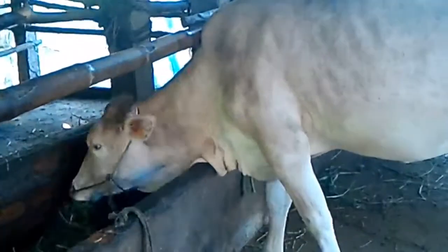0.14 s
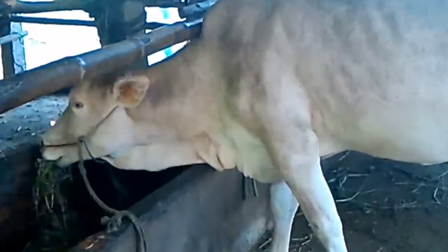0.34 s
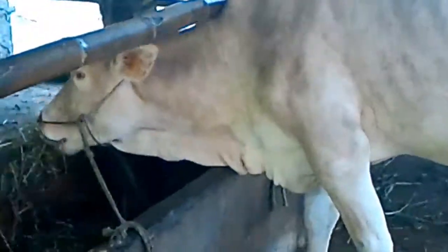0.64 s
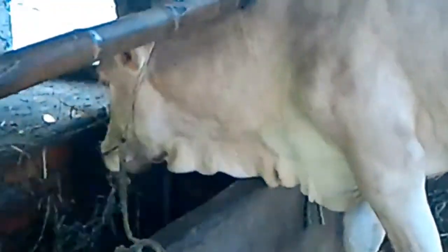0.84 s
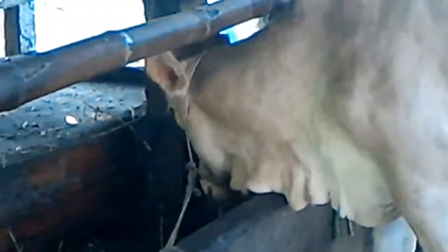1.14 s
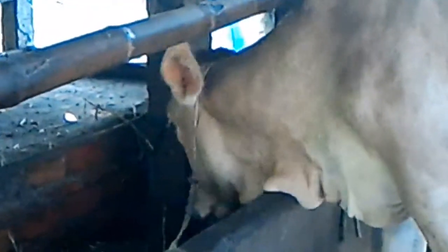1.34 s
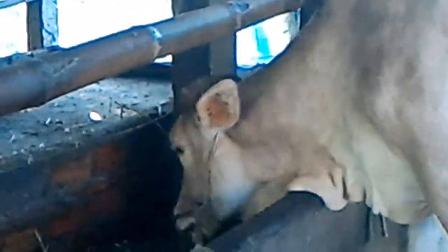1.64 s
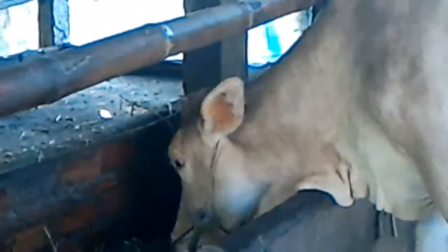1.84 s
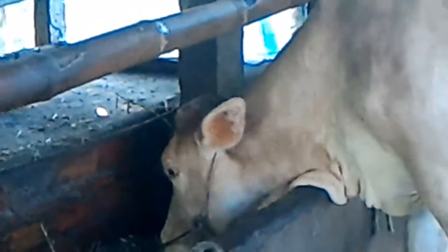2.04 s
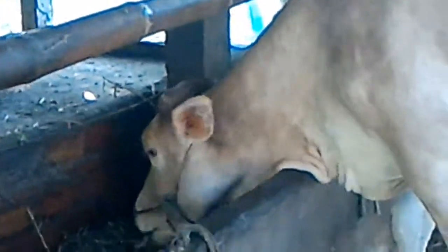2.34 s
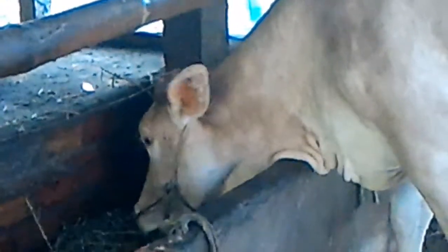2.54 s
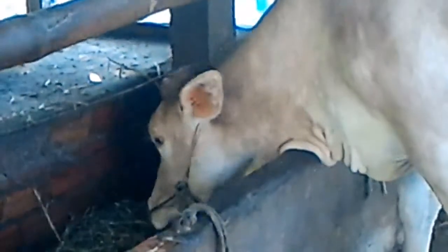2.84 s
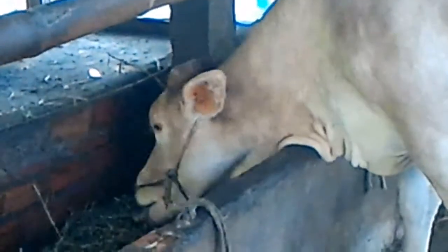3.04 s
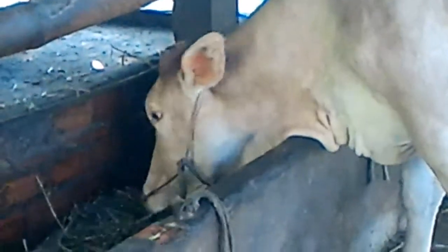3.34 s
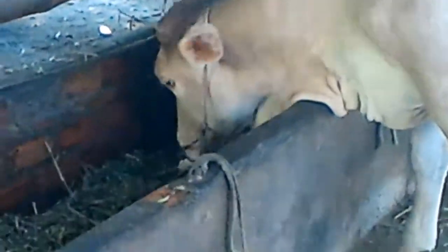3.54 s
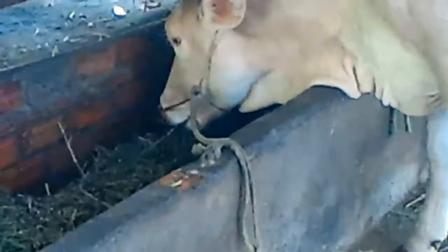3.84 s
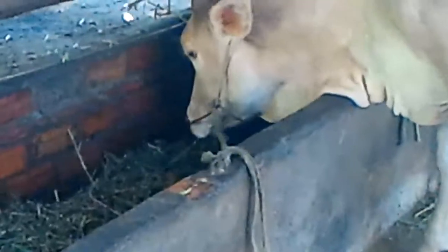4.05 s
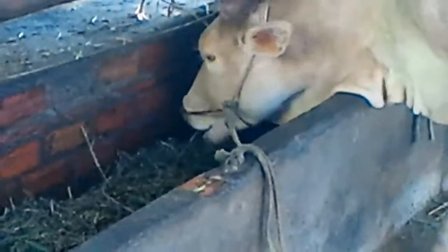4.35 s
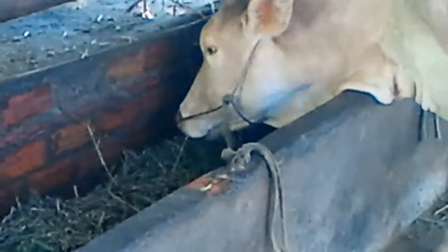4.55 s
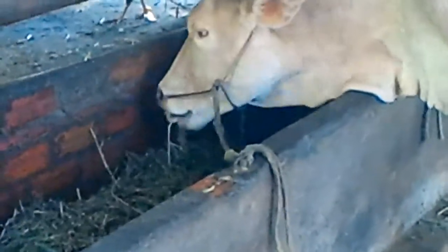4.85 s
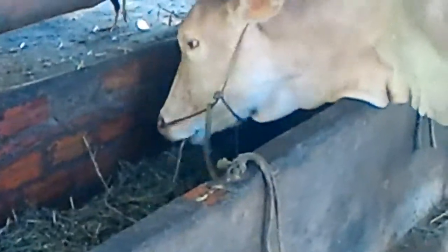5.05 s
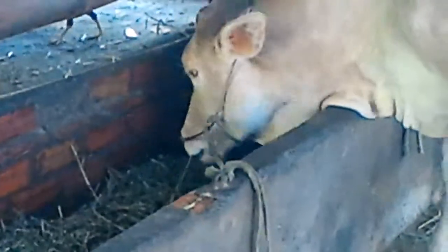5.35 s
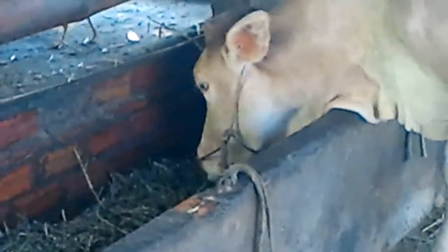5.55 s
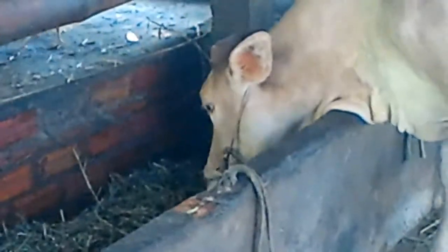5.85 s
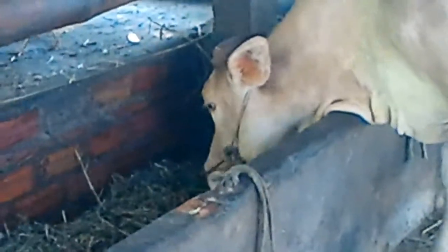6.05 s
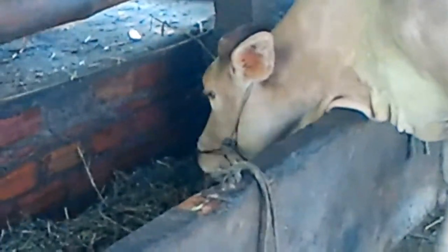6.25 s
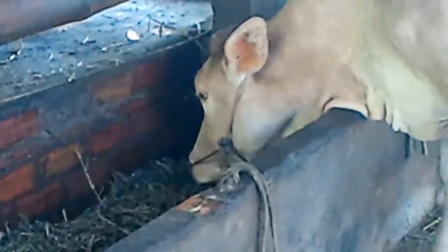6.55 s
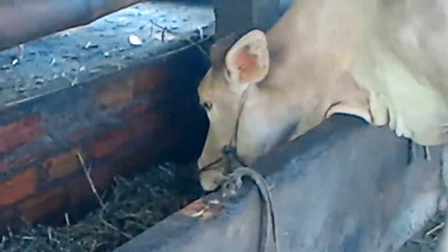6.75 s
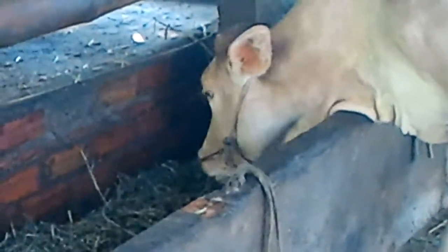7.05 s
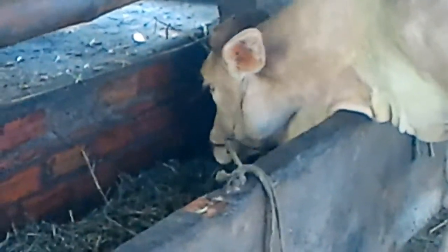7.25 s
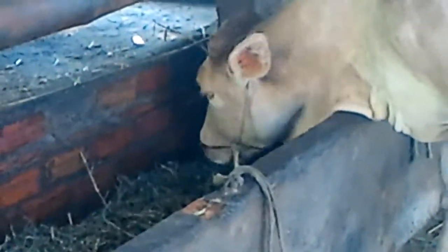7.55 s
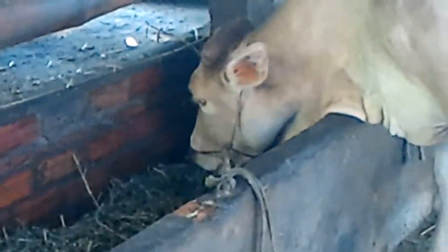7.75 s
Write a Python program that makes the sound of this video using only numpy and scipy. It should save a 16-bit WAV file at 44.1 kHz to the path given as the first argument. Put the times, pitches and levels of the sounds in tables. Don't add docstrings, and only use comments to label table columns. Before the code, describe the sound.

In a quiet cattle shed, hens cluck faintly, far roosters crow, then a cow gives one loud low moo ending roughly amid thumps and straw snaps.

```python
import sys
import numpy as np
from scipy import signal
from scipy.fft import rfft, irfft, next_fast_len
from scipy.io import wavfile
from scipy.ndimage import uniform_filter1d, map_coordinates

SR = 44100
rng = np.random.default_rng(int(sys.argv[2]) if len(sys.argv) > 2 else 0)


def rack_gain(trim_db):
    fader = np.asarray(trim_db, float)
    return 10 ** (fader / 20)


def unload_wav(signal):
    wavfile.write(
        sys.argv[1],
        SR,
        np.round(np.clip(np.atleast_2d(signal).T, -1, 1) * 32767).astype(np.int16),
    )


N = 348998
TIME = np.arange(N) / SR


def unit(x):
    return x / np.sqrt(np.mean(x ** 2) + 1e-20)


def along(points, hz):
    f, v = np.transpose(points)
    return np.interp(np.log(hz + 1), np.log(f + 1), v)


def curves(rows):
    s, *cols = np.transpose(rows)
    return [np.interp(TIME, s, c) for c in cols]


def gate(start, length, edge):
    inside = np.minimum(TIME - start, start + length - TIME)
    return np.clip(inside / edge, 0, 1) ** 2


def rising(at_s, takes_s):
    return 0.5 + 0.5 * np.tanh((TIME - at_s) / takes_s / 2)


def lifts(rows):
    bells = []
    for s, rise, fall, db in rows:
        side = np.where(TIME < s, rise, fall)
        bells.append(db * np.exp(-0.5 * ((TIME - s) / side) ** 2))
    return np.max(bells, axis=0)


def wobble(rate):
    knots = rng.standard_normal(int(N * rate / SR) + 4)
    return map_coordinates(knots, [TIME * rate])


def coloured(x, level_db):
    m = next_fast_len(len(x) + SR // 2)
    gain = rack_gain(level_db(np.fft.rfftfreq(m, 1 / SR)))
    cepstrum = irfft(np.log(gain + 1e-6), m)
    cepstrum[1:m // 2] *= 2
    cepstrum[m // 2 + 1:] = 0
    return irfft(rfft(x, m) * np.exp(rfft(cepstrum)), m)[:len(x)]


def humps(peaks):
    def level_db(f):
        power = sum(rack_gain(db) ** 2 / (1 + ((f - c) / w) ** 2) ** 2 for c, w, db in peaks)
        return 10 * np.log10(power)
    return level_db


def rush(spectrum, patchy_db):
    z = signal.stft(rng.standard_normal(N), nperseg=512)[2]
    field = uniform_filter1d(rng.standard_normal(z.shape), size=8, axis=0)
    field = uniform_filter1d(field, size=10, axis=1)
    x = signal.istft(z * rack_gain(patchy_db * unit(field)), nperseg=512)[1][:N]
    return unit(coloured(x, lambda hz: along(spectrum, hz)))


# frequency in Hz, density in dB per Hz.
RUMBLE = [(12, -47), (20, -15.5), (38, -2.5), (59, -1), (118, -7), (152, -10), (220, -29.5), (290, -36),
          (480, -120)]
# peak in seconds, rise in seconds, fall in seconds, lift in dB.
RUMBLE_LIFTS = [
    (2.68, .2, .15, 4.7),
    (5.5, 0.43, 0.23, 12),
    (5.9, 0.23, .35, 13.1),
]


def rumble():
    return rack_gain(-61 + lifts(RUMBLE_LIFTS) + 2.5) * rush(RUMBLE, patchy_db=0.5)


# frequency in Hz, density in dB per Hz.
YARD = [(120, -41), (200, 1), (222, -5), (345, -4.5), (552, -10), (624, -8), (1410, -10.5), (1750, -11.5),
        (4090, -18), (7500, -33.5), (9750, -63), (16500, -120)]
# frequency in Hz, density in dB per Hz.
HISS = [(2940, -39), (5000, -2), (6610, -11.5), (7980, -10), (8820, -3.5), (10500, 0.5), (11700, -5),
        (15100, -6.5), (15800, -5)]
# peak in seconds, rise in seconds, fall in seconds, lift in dB.
HISS_LIFTS = [
    (1.94, .2, 0.1, 4),
    (2.72, 0.16, 0.11, 5.5),
    (5.25, 0.36, 0.38, 12),
    (5.8, 0.34, 0.3, 10.5),
]


def murmur_and_hiss():
    hiss_db = -72.5 + lifts(HISS_LIFTS)
    murmur = rack_gain(1.05 * (hiss_db + 73.5) - 68.5) * rush(YARD, patchy_db=1.1)
    hiss = rack_gain(hiss_db + 3 + 0.51 * wobble(11)) * rush(HISS, patchy_db=2.0)
    return murmur + hiss


def far_notes(notes):
    out = np.zeros(N)
    drift, flutter = wobble(35), wobble(22)
    for s, length, start_hz, glide_hz, db, octave_db in notes:
        i, n = round(s * SR), round(length * SR)
        u = np.arange(n) / n
        shift = rng.integers(N - n)
        hz = (start_hz + glide_hz * u) * (1 + 0.0025 * drift[shift:shift + n])
        half_phase = np.pi * np.cumsum(hz) / SR
        tone = np.sin(2 * half_phase) + rack_gain(octave_db) * np.sin(half_phase)
        swell = rack_gain(3 + 2.2 * flutter[shift:shift + n]) * np.sin(np.pi * u ** 0.4) ** 0.6
        out[i:i + n] += rack_gain(db) * swell * tone
    return out


# start in seconds, length in seconds, frequency in Hz, level in dB.
HENS = [(0, 0.15, 990, -72), (0.891, 0.24, 992, -71.5), (0.95, 0.098, 1057, -76), (1.876, .1, 2440, -72),
        (2.415, 0.13, 1036, -64), (2.7, 0.17, 1025, -65.5), (3.65, .41, 1010, -83),
        (4.226, 0.31, 987, -75.5), (6.459, 0.083, 1624, -67), (7.027, 0.078, 1763, -64.5),
        (7.228, 0.13, 1793, -73), (7.389, .09, 1780, -73), (7.696, .2, 1690, -77)]


def hens():
    return far_notes([(s, length, hz, -19, db, -30) for s, length, hz, db in HENS])


def burst(shape, hz, octaves):
    band = lambda f: np.maximum(-4.3 * (np.log2((f + 1) / hz) / octaves) ** 2, -70)
    return shape * unit(coloured(rng.standard_normal(len(shape)), band))


# start in seconds, length in seconds, centre in Hz, width in octaves, level in dB.
PUFFS = [(0.19, 0.16, 3830, 0.37, -63), (5.865, 0.058, 14000, 0.59, -52.5), (5.815, 0.042, 8800, 1, -62),
         (3.85, 0.98, 1100, 0.92, -75.5), (0.2, 0.24, 2010, 0.21, -72), (0.52, 0.036, 500, 0.29, -76),
         (0.69, 0.24, 1100, 0.81, -70), (1.002, .09, 3370, .25, -67), (1.417, .064, 950, .69, -68),
         (1.605, .05, 570, 1.3, -65.5), (1.808, .07, 770, 0.85, -68), (1.64, 0.67, 3700, 0.36, -75),
         (2.74, 0.16, 1700, 1.04, -67), (3.492, 0.064, 450, 1.16, -56), (4.065, 0.19, 2070, 0.72, -67),
         (6.502, 0.73, 2170, 0.55, -64), (6.564, 0.25, 770, 0.7, -67.5), (7.409, 0.1, 450, 0.42, -68),
         (7.422, 0.12, 2000, .6, -70.5), (7.15, 0.82, 970, 1.4, -81), (7.14, .22, 330, 0.19, -72.5),
         (1.08, 0.053, 500, .35, -74), (2.3, 0.15, 620, 0.18, -69)]


def snorts_and_rustles():
    out = np.zeros(N + SR)
    for s, length, hz, octaves, db in PUFFS:
        u = np.linspace(0, 1, round(length * SR))
        swell = np.sin(np.pi * u ** 0.7) ** 1.2
        out[round(s * SR):][:len(u)] += rack_gain(db + 3) * burst(swell, hz, octaves)
    return out[:N]


# centre in Hz, width in Hz, level in dB.
BEAK = [(750, 93, 0.5), (1057, 96, -5), (1480, 215, -0.5), (1880, 150, -5), (2860, 250, -13),
        (3260, 230, -14.5)]
# start in seconds, length in seconds, frequency in Hz, glide in Hz, level in dB.
CROWS = [
    (1.98, 0.24, 1350, -14, -65),
    (2.2, 0.23, 1510, 33.5, -65.5),
    (2.385, 0.14, 1345, 57, -57.5),
    (2.461, 0.14, 1450, 10, -55),
    (2.581, 0.305, 1546, -14, -54),
    (2.62, 0.423, 1645, -24, -66.5),
    (3.28, 0.46, 1378, 7.5, -65.5),
    (3.581, 0.26, 1318, -21, -62),
]
# start in seconds, length in seconds,
# frequency in Hz, glide in Hz, level in dB.
FAR_CALLS = [
    (2.05, 0.33, 1793, 5.5, -78),
    (2.187, 0.14, 2304, -61, -89),
    (2.294, .5, 2850, 201, -74),
    (2.45, .8, 1880, 14.5, -74),
    (2.78, .38, 2880, -170, -67.5),
    (2.799, 0.25, 3034, -220, -67),
]


def roosters():
    tones = far_notes([(*row, -8) for row in CROWS] + [(*row, -30) for row in FAR_CALLS])
    rise_db_per_s, fall_db_per_s, peak_s = 27.5, 11.5, 2.7
    rasp_db = -56 - np.maximum(rise_db_per_s * (peak_s - TIME), fall_db_per_s * (TIME - peak_s))
    throbbing = rng.standard_normal(N) * rack_gain(2 * wobble(90))
    rasp = unit(coloured(throbbing, humps(BEAK)))
    return tones + rack_gain(rasp_db) * gate(1.82, 1.99, edge=0.061) * rasp


# start in seconds, peak in dB, centre in Hz, width in octaves, decay time t60 in seconds.
KNOCKS = [
    (2.033, -47, 3120, 0.18, 0.053),
    (2.408, -42, 1360, 0.14, 0.07),
    (3.499, -42, 604, 0.48, 0.059),
    (5.566, -15.5, 397, 0.66, 0.024),
    (5.813, -38.5, 750, 0.22, 0.04),
    (5.864, -40.5, 1160, 0.44, 0.04),
    (7.424, -50.5, 2800, 0.29, 0.045),
    (7.729, -55.5, 2000, 0.41, 0.025),
]
# start in seconds, peak in dB, centre in Hz, width in octaves, decay time t60 in seconds.
SNAPS = [
    (2.358, -59, 2730, 2.4, 0.02),
    (5.813, -34, 12400, 4.2, 0.022),
    (5.8621, -28, 14100, 1.95, 0.035),
    (7.6595, -40.5, 5150, 4.5, 0.0072),
    (7.692, -33, 10100, 1.2, 0.0047),
]


def knocks_and_snaps():
    out = np.zeros(N + SR)
    t = np.arange(SR // 8) / SR
    for s, db, hz, octaves, t60 in [*SNAPS, *KNOCKS]:
        decay = rack_gain(-60 * (t / t60) ** 1.4)
        out[round(s * SR):][:len(t)] += rack_gain(db - 8) * burst(decay, hz, octaves)
    return out[:N]


BREAK_S, BREAK_WIDTH_S = 4.96, 0.043

# time in seconds, effort in dB, mouth opening from 0 to 1.
MOO = [
    (4.4, -60, 0.2),
    (4.488, -54, 0),
    (4.634, -46.5, 0.1),
    (4.69, -39.5, 0.83),
    (4.74, -33, 0.88),
    (4.91, -27, 0.88),
    (5.24, -24.5, 0.84),
    (5.58, -24, 0.78),
    (5.78, -52, 0.81),
]


def effort():
    push_db, opening = curves(MOO)
    catch_db = -3.5 * lifts([(BREAK_S, BREAK_WIDTH_S, BREAK_WIDTH_S, 1)])
    swing_s, swing_hz = 5.29, 8.3
    swing = np.cos(2 * np.pi * swing_hz * (TIME - swing_s))
    swing_db = 2.2 * gate(swing_s, 0.256, edge=0.048) * swing
    over_db = push_db + 25.5
    after = rising(BREAK_S, BREAK_WIDTH_S)
    hum_db = -40 + 0.3 * over_db + 3 * rising(5.14, 0.06) - 1.5 * rising(5.0, 0.03)
    chest_db = push_db + 0.5 - 6 * rising(5.475, 0.016) + 0.33 * catch_db + swing_db
    throat_db = -30 + 0.79 * over_db + catch_db + 2.5 * after
    mouth_db = push_db + catch_db - 0.5 * after - 0.41 * swing_db - 28.5 * (1 - opening)
    return hum_db, chest_db, throat_db, mouth_db


def hoarseness():
    held = 0.07 + 0.68 * (1 - rising(4.61, 0.045)) + 0.06 * rising(BREAK_S, BREAK_WIDTH_S)
    return np.clip(held + (1 - held) * rising(5.48, 0.05), 0, 1)


def fold_pulses(phase):
    waver = wobble(28)
    out = np.zeros(N)
    for k in range(1, 28):
        drift = rng.normal(0, 1.1) + 0.03 * k * np.roll(waver, 9000 * k)
        level = 1 + 0.025 * k * np.roll(waver, -7000 * k)
        out += level * np.cos(k * phase + drift)
    return unit(out)


def fold_gusts(phase):
    gusts = (1 + 0.4 * np.cos(phase)) * rack_gain(2 * wobble(60)) * rng.standard_normal(N)
    return unit(coloured(gusts, lambda f: 9 * (f > 1300) - 60 * (f > 3700)))


# centre in Hz, width in Hz, level in dB.
NOSE = [(1720, 110, 0), (2380, 110, -14), (3100, 150, -17), (3540, 170, -16), (4650, 300, -21),
        (5500, 450, -23)]


def nostril_air(phase):
    sniff_db = -55 + 27 * (np.clip(TIME, 4.5, 4.75) - 4.5)
    breath = rng.standard_normal(N) * (1 + 0.29 * np.cos(phase))
    return rack_gain(sniff_db + 2.5) * gate(4.43, 0.35, edge=0.11) * unit(coloured(breath, humps(NOSE)))


# frequency in Hz, density in dB per Hz.
HAZE = [(1410, -23), (2400, -1), (2740, -6), (3200, -7), (3800, -10.5), (8000, -28.5), (10400, -58),
        (17600, -120)]


def mouth_breath(phase, mouth_db):
    smooth_db = uniform_filter1d(mouth_db, size=4000)
    haze_db = 0.52 * (smooth_db + 29.5) - 57 + 6 * rising(BREAK_S, BREAK_WIDTH_S)
    return rack_gain(haze_db) * (1 + 0.16 * np.cos(phase)) * rush(HAZE, patchy_db=2.0)


# frequency in Hz, gain in dB.
TRACT = [(60, -22), (121, -14), (242, 0), (363, -8), (484, -13), (605, -7.5), (726, -27), (847, -21),
         (968, -8), (1210, -11), (1450, -20), (1930, -27), (2100, -20), (2900, -46)]
# centre in Hz, width in
# Hz, gain in dB.
STALL = [(185, 22, -9), (800, 35, -6), (242.4, 1.6, -5), (371, 6, -8), (487, 8, 5), (606, 4.6, -15),
         (735, 5.7, 8), (860, 5, 7), (996, 6.3, -14), (1082, 5, -6), (1100, 35, -4), (1187, 7.5, -11),
         (1340, 20, -5), (1455, 6, -12), (1492, 5, -5), (1550, 12, -5), (1614, 6.5, 9), (1710, 7, 8),
         (1840, 10, -6), (1890, 10, -9), (2022, 20, -9), (2108, 14, 3), (2240, 12, 4), (2300, 10, 6)]


def path_db(f):
    modes_db = sum(db * np.exp(-0.5 * ((f - c) / w) ** 2) for c, w, db in STALL)
    return along(TRACT, f) + modes_db


# time in seconds, pitch in Hz.
PITCH = [
    (4.42, 80.5),
    (4.53, 103.8),
    (4.67, 118.4),
    (4.924, 121.7),
    (4.96, 123.5),
    (5.188, 124.2),
    (5.268, 123.6),
    (5.468, 116.6),
    (5.62, 74.8),
]


def cow():
    pitch, = curves(PITCH)
    phase = 2 * np.pi * np.cumsum(pitch * (1 + 0.001 * wobble(40))) / SR
    hum_db, chest_db, throat_db, mouth_db = effort()
    palate_db = mouth_db + 2.5 - 2 * rising(BREAK_S - 0.02, 0.0092)
    rough, clean, gusts = hoarseness(), fold_pulses(phase), fold_gusts(phase)
    sounding = gate(4.39, 1.41, edge=0.07)
    # level in dB, lower and upper edge in Hz, hold (low overtones stay clean longer)
    bands = ((hum_db, 60, 170, 4), (chest_db, 170, 430, 1.2), (throat_db, 430, 780, 0.9),
             (palate_db, 780, 1300, 0.85), (mouth_db - 4, 1300, 3700, 0.8))
    voice = np.zeros(N)
    for db, lo_hz, hi_hz, hold in bands:
        source = (np.sqrt(1 - rough ** (2 * hold)) * clean + rough ** hold * gusts) * sounding

        def part_db(f):
            edges = (1 + (f / hi_hz) ** 12) * (1 + (lo_hz / (f + 1)) ** 12)
            return path_db(f) - 10 * np.log10(edges)
        voice += rack_gain(db - 9.5) * unit(coloured(source, part_db))
    return sounding * (voice + mouth_breath(phase, mouth_db)) + nostril_air(phase)


# frequency in Hz, decay time t60 in seconds.
SHED = [(100, 0.58), (400, 0.61), (2000, 0.56), (8000, 0.082)]


def shed(x):
    hz, t, z = signal.stft(rng.standard_normal(SR), SR, nperseg=256)
    decay = rack_gain(-60 * t / along(SHED, hz)[:, None])
    tail = signal.istft(z * decay, SR, nperseg=256)[1]
    delayed = np.pad(x, (600, 0))
    return signal.fftconvolve(delayed, tail / np.linalg.norm(tail))[:N]


def scene():
    air = rumble() + murmur_and_hiss()
    birds = hens() + roosters()
    close = snorts_and_rustles() + knocks_and_snaps()
    low = cow()
    answer = shed(rack_gain(-13) * low + rack_gain(-5.5) * birds)
    return (low + birds + answer + close + air)[None]


def top_cut(x):
    return signal.sosfilt(signal.butter(12, 16860, fs=SR, output="sos"), x)


def record(dry):
    passed = np.fft.rfftfreq(N, 1 / SR) < 15830
    kept = irfft(rfft(dry) * passed, N)
    return top_cut(kept)


dry = scene()
out = record(dry)
unload_wav(out)
```